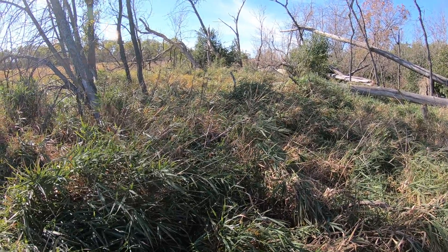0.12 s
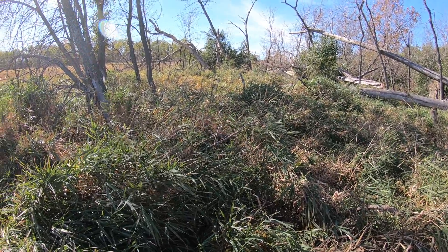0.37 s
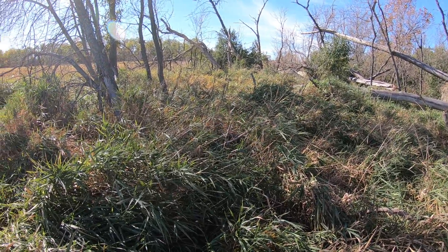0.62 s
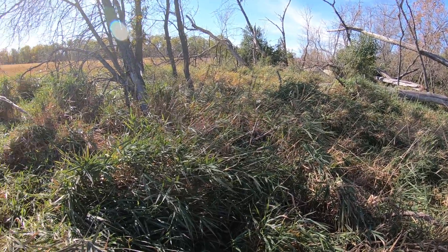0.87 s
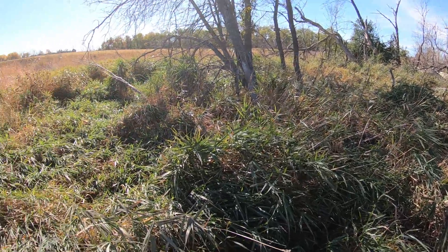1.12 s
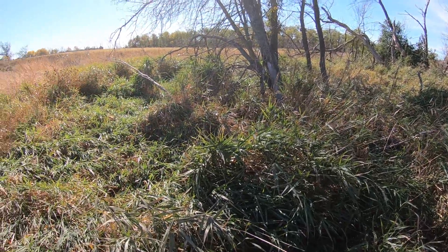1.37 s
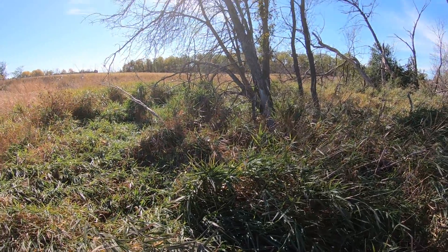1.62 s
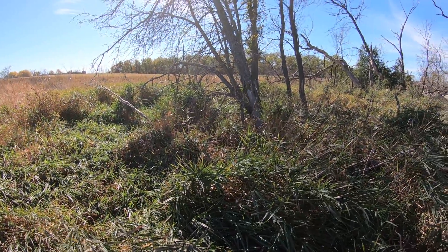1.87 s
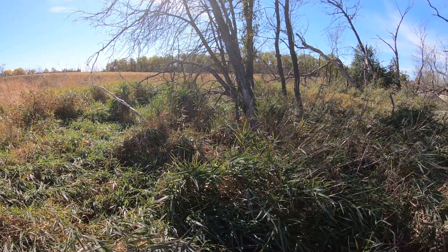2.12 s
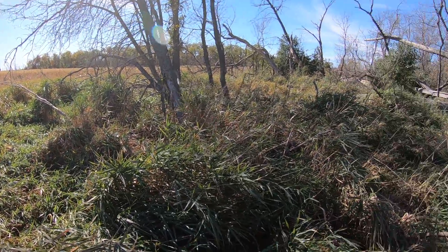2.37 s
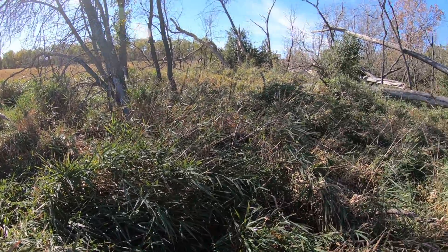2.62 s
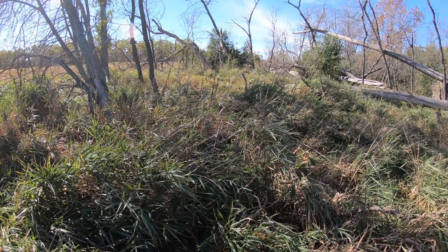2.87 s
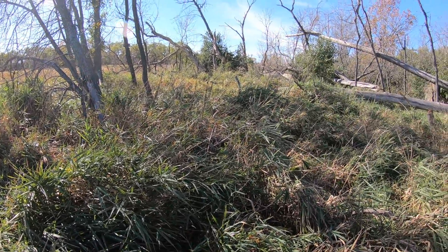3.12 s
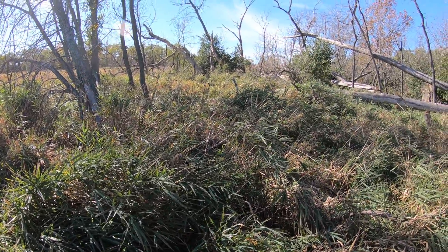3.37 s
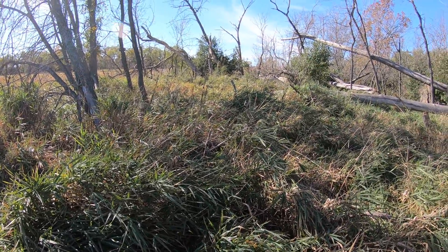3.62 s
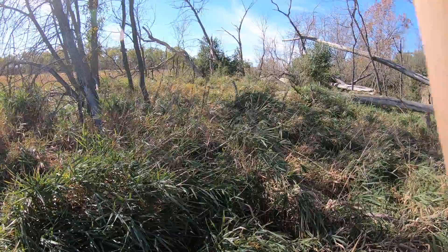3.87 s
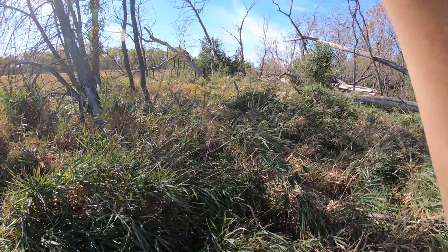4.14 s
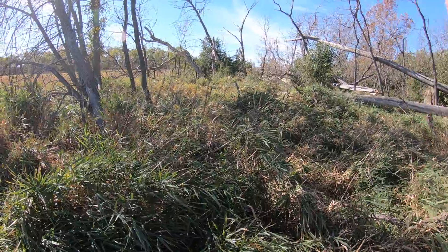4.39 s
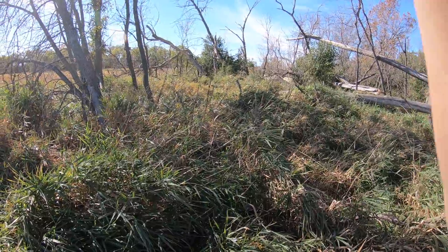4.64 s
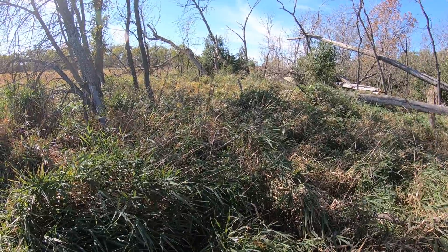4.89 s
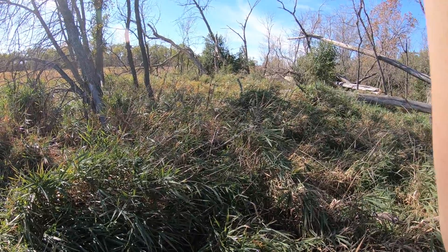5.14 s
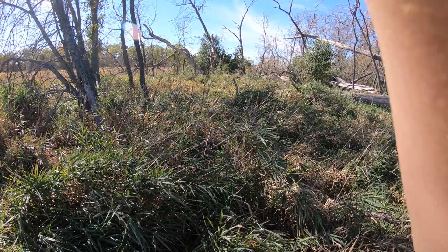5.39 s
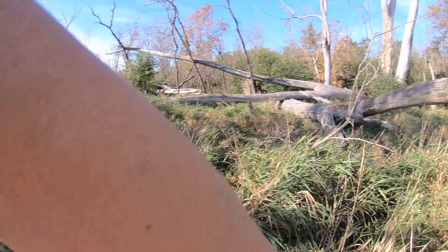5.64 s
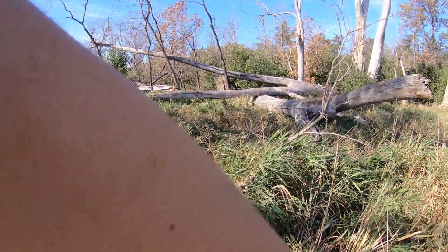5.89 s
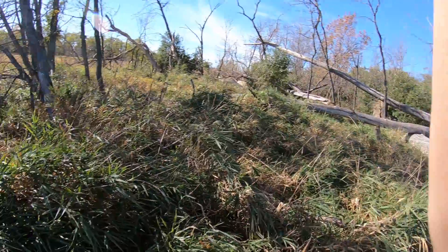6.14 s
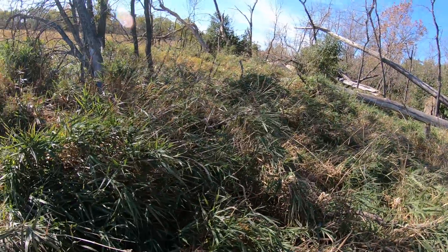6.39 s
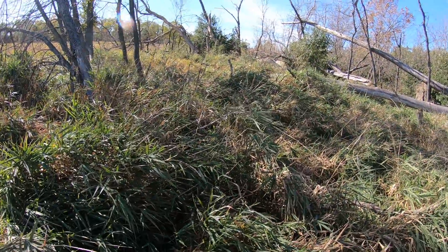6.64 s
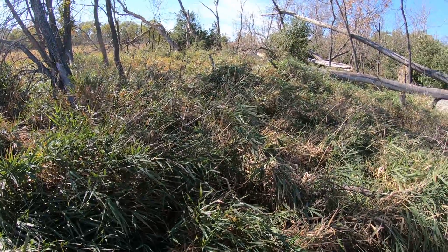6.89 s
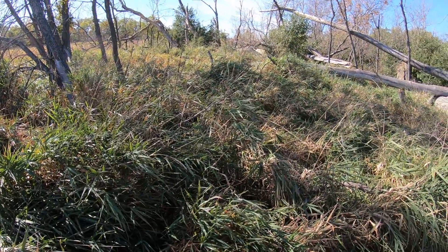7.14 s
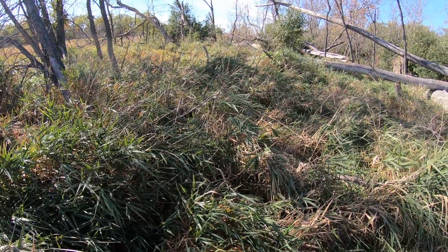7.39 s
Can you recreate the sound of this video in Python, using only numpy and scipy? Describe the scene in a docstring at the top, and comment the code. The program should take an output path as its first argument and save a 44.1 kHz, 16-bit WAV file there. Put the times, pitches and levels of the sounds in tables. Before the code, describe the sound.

Loud hard knocks come in uneven pairs close to the microphone, over gusty low wind rumble and the faint rustle of dry grass.

```python
"""Walking through dry grass

Someone moves through tall dry grass in gusty wind; pairs of hard knocks strike close to a small microphone.
Wind, grass and hiss are shaped noise, with faint narrow strips of noise; stalks snap in short puffs. A knock is
a short clipped ring with a crack and a thump; thin tones swell towards it. A limiter holds the peaks and ducks
wind and grass after them."""
import sys
import numpy as np
from scipy import signal
from scipy.fft import rfft, irfft
from scipy.io import wavfile
from scipy.ndimage import uniform_filter1d, minimum_filter1d

SR = 44100
rng = np.random.default_rng(int(sys.argv[2]) if len(sys.argv) > 2 else 0)


def put_to_file(sound):
    """Save the sound as 16-bit audio at rate SR, in the file named by the first command-line argument."""
    columns = np.atleast_2d(sound).T  # one column per channel
    safe = np.clip(columns, -1, 1)
    whole_steps = np.round(safe * 32767)
    wavfile.write(sys.argv[1], SR, whole_steps.astype(np.int16))


def volts(x):
    """Linear amplitude factor 10**(x/20) for a level x in dB, scalar or array-like."""
    e = np.asarray(x, float) / 20
    return 10 ** e


N = 331191  # length in samples


def evened(x):
    """Normalization: scales to rms 1."""
    return x / np.sqrt(np.mean(x ** 2) + 1e-20)


def read(points, hz):
    """Spectral interpolation: dB on a log-frequency axis, silent above the last point."""
    f, value = np.transpose(points)
    return np.interp(np.log(hz + 1), np.log(f + 1), value, right=-120)


def add(mix, s, sound):
    """Superposition: adds a sound into the mix from time s."""
    part = mix[round(s * SR):][:len(sound)]
    part += sound[:len(part)]


def follow(table):
    """Linear interpolation: joins a control table into one dB curve a column."""
    s, *columns = np.transpose(table)
    return [np.interp(np.arange(N) / SR, s, db) for db in columns]


def lumps(per_s):
    """Low-pass filtering: slow random fluctuation of rms 1, cut off at per_s in Hz."""
    b, a = signal.butter(2, per_s, fs=SR / 64)
    coarse = signal.lfilter(b, a, rng.standard_normal(N // 64 + 9))
    return np.interp(np.arange(N) / 64, np.arange(len(coarse)), evened(coarse))


def noise(colour, patchy_db, flicker_db, size=1024):
    """Overlap-add synthesis: random spectra with drifting patches and a flicker shared by all bins."""
    frames, hz = 4 * N // size + 5, np.fft.rfftfreq(size, 1 / SR)
    real, imag, patches = rng.standard_normal((frames, len(hz), 3)).T
    patches = uniform_filter1d(patches, size=5, axis=0)  # over frequency
    patches = evened(uniform_filter1d(patches, size=12, axis=1))  # over time
    flicker = evened(uniform_filter1d(rng.standard_normal(frames), size=3))
    level_db = read(colour, hz)[:, None] + patchy_db * patches + flicker_db * flicker
    spectra = (real + 1j * imag) * volts(level_db)
    sound = signal.istft(spectra, nperseg=size, noverlap=size * 3 // 4)[1]
    return evened(sound[:N])


def burst(colour, decay_s, size=1024):
    """Impulsive excitation: a puff of coloured noise, linear rise and exponential decay, peak 1."""
    t, hz = np.arange(size) / SR, np.fft.rfftfreq(size, 1 / SR)
    puff = irfft(rfft(rng.standard_normal(size)) * volts(read(colour, hz)))
    puff = puff * t * np.exp(-t / decay_s)
    return puff / abs(puff).max()


# rising and falling breeze on the microphone: t/s, strength level/dB, bite/dB (how far it reaches up in pitch)
GUSTS = [(0.0, -45.5, -3.5), (0.69, -35.5, -2.5), (0.94, -37, 8.5), (1.13, -45.5, -8.5),
         (1.23, -52.5, -4.5), (1.51, -44.5, 1.5), (1.65, -38.5, -2), (1.78, -39.5, 0.5), (1.92, -49, -3),
         (2.32, -58, -1), (2.49, -49.5, -1.5), (2.61, -44.5, -1.5), (3.01, -45.5, 2), (3.39, -51, -3),
         (3.72, -56, 1.5), (4.02, -34, -0.5), (5.02, -42.5, -3.5), (5.48, -56, -1.5), (6.73, -61.5, 5.5),
         (7.01, -38, -8.5), (7.11, -46, -11.5), (7.51, -36.5, 4.5)]
# single puffs of wind: t/s of the top, strength level/dB, length/s, bite/dB
PUFFS = [(0.094, -35, 0.15, -6.5), (.3, -32.5, 0.084, -2.5), (0.5, -34, 0.11, 1), (0.811, -31, 0.17, 0),
         (.95, -42, 0.1, -4.5), (1.046, -34.5, .12, 4.5), (1.215, -48.5, .05, -1.5), (1.279, -49, 0.028, 1),
         (1.6, -40, 0.055, 9.5), (1.666, -38.5, 0.076, 11), (1.86, -39.5, 0.16, -2),
         (2.226, -41.5, 0.074, -4.5), (2.707, -46, 0.13, -10), (2.99, -37.5, 0.039, -0.5),
         (3.096, -41.5, 0.13, -1.5), (3.282, -41, 0.047, 2), (3.805, -29.5, 0.032, -3.5),
         (3.865, -30, 0.064, 3.5), (4.11, -29.5, 0.24, 1), (4.21, -39, 0.052, 14.5), (4.386, -35, 0.11, 10),
         (4.47, -44, 0.023, 11), (4.591, -47.5, 0.039, -13), (4.83, -33, 0.19, 7), (5.165, -25, 0.18, 2),
         (5.5, -52.5, 0.064, -19), (5.952, -41.5, .04, -5), (6.136, -42.5, 0.055, -7),
         (6.217, -37.5, .1, -0.5), (6.417, -50, 0.042, -14), (6.87, -48.5, .1, -1.5),
         (7.144, -27.5, 0.17, -2), (7.302, -48, 0.067, 1.5), (7.472, -32.5, 0.14, -2.5)]


def wind_strength():
    """Amplitude addition: bell-shaped puffs ride on the breeze and bring their own bite; both in dB."""
    breeze, bite = follow(GUSTS)
    t, total = np.arange(N) / SR, volts(breeze)
    bite = bite * total  # bite is averaged with amplitude as its weight
    for s, db, length, reach_db in PUFFS:
        puff = volts(db) * np.exp(-((t - s) / (0.36 * length)) ** 2)
        total = total + puff
        bite = bite + reach_db * puff
    return 20 * np.log10(total), bite / total


# relative spectra of the wind, from lowest layer to highest: f/Hz, level/dB (per Hz)
RUMBLE = [(12, -38.5), (25, -4), (60, 6), (110, 1), (160, -6), (300, -59.5), (500, -82)]
BUFFET = [(70, -32), (130, -3), (180, 0), (260, -7.5), (350, -15), (500, -55.5), (800, -75)]
ROAR = [(200, -28), (330, -2.5), (460, -6), (700, -16), (1000, -31.5), (1500, -50.5), (2500, -87)]


def wind():
    """Turbulent pressure on a microphone: three lumpy noise layers rise with strength; bite tilts them."""
    BREEZE_DB = -50  # strength of a light breeze, from which the layers rise
    strength, bite = wind_strength()
    gust = strength - BREEZE_DB
    rumble_db = BREEZE_DB - 2 + gust - 0.36 * bite + 1.3 * lumps(20)
    buffet_db = BREEZE_DB - 1 + 0.64 * gust + 0.8 * bite + 4 * lumps(14)
    roar_db = BREEZE_DB - 16 + 0.88 * gust + 1.6 * bite + 3.5 * lumps(20)
    rumble = volts(rumble_db) * noise(RUMBLE, 0.97, 0.54, size=2048)
    buffet = volts(buffet_db) * noise(BUFFET, 1.9, 1.2)
    roar = volts(roar_db) * noise(ROAR, 0.38, 1.8, size=512)
    return rumble + buffet + roar


# rustling in time: t/s, rustle level/dB, airiness level/dB (relative to the rustle)
RUSTLES = [(0.0, -47, -29), (0.21, -45.5, -27.5), (0.33, -49.5, -26.5), (0.67, -49, -29), (1.21, -52, -29),
           (1.42, -53.5, -28.5), (2.05, -56, -29), (2.7, -52.5, -29.5), (2.87, -54.5, -27.5),
           (3.09, -54.5, -29), (3.24, -56, -29.5), (4.87, -50.5, -28), (4.98, -48, -27), (5.1, -58, -28.5),
           (5.29, -58, -29), (5.73, -55, -29.5), (5.9, -60.5, -27), (6.02, -56.5, -26.5),
           (6.94, -51.5, -27.5), (7.51, -50, -27.5)]
# relative spectra of low swish, rustle and airy top: f/Hz, level/dB (per Hz)
SWISH = [(300, -24.5), (700, -3), (1250, -1.5), (1700, -3), (2300, -3.5), (3000, -35.5), (4000, -48.5)]
GRASS = [(1500, -33), (2300, -11.5), (3000, -6), (4300, -6), (5300, -1), (6600, -9.5), (7900, -24),
         (10000, -33), (12000, -57.5)]
AIR = [(9000, -21.5), (11500, -1.5), (13000, 4.5), (14500, -2.5), (16000, -9.5)]


def grass():
    """Broadband friction noise: rustle with an airy top, over a swish that follows it less steeply."""
    rustle, airy = follow(RUSTLES)
    swish_db = -64 + 0.46 * (rustle - rustle.mean())
    swish = volts(swish_db) * noise(SWISH, 0.28, 0.8)
    blades = noise(GRASS, 2.7, 0.68) + volts(airy) * noise(AIR, 1.5, 0.8)
    return swish + volts(rustle) * blades


# relative spectrum of the capsule's own hiss: f/Hz, level/dB (per Hz)
CAPSULE = [(500, 0), (5000, -3), (9000, -14), (16000, -15.5)]


def capsule_hiss():
    """Self-noise: the capsule's faint, nearly steady hiss."""
    return volts(-84) * noise(CAPSULE, 0.4, 0.21)


# faint narrow strips of noise between knocks: start t/s, f/Hz, bandwidth/Hz, level/dB
NOISE_STRIPS = [(0, 4160, 294, -48.5), (0.36, 4460, 70, -58.5), (0.72, 4170, 70, -62),
                (0.719, 6890, 60, -79.5), (2.6, 4240, 250, -56), (2.9, 4000, 100, -64.5),
                (2.901, 7600, 60, -79), (4.009, 9720, 59.6, -89), (5.118, 3353, 50, -65.5),
                (5.12, 6300, 70, -67), (5.93, 4046, 60, -66.5), (6.298, 4680, 70, -64)]


def noise_strips():
    """Narrow-band noise: a faint narrow strip of noise sounds from its start until a following knock."""
    out = np.zeros(N)
    for start, hz, width_hz, db in NOISE_STRIPS:
        end = min(row[0] for row in KNOCKS if row[0] > start + 0.1)
        t = np.arange(start, end, 1 / SR)
        r = np.exp(-np.pi * width_hz / SR)  # pole radius
        hiss = rng.standard_normal((len(t), 2)) @ [1, 1j]
        waver = signal.lfilter([1], [1, -2 * r, r * r], hiss)
        strip = evened((waver * np.exp(2j * np.pi * hz * t)).real)
        add(out, start, volts(db) * strip * signal.windows.tukey(len(t), 0.2))
    return out


# thin tones, one list a knock: f/Hz, level/dB, offset f/Hz of a weaker neighbour that beats with it
TONES = [
    [(1260, -24, -120), (2180, -27.5, 111), (3830, -35.5, 106), (5080, -32, -160), (4544, -38, 87.5),
     (6331, -37.5, 87.5)],
    [(1252, -24.5, -74), (2000, -34, 300.5), (2500, -30.5, 88), (4270, -25.5, 312.5), (4790, -29.5, 108.5),
     (6900, -39.5, 114.5)],
    [(1150, -36, -124), (1676, -37.5, -77.5), (2900, -45.5, 180.5), (882, -44, 106), (2300, -45, -80.5),
     (4300, -48.5, 298)],
    [(1266, -27.5, 91), (2030, -30.5, 92), (4285, -32, 97.5), (4940, -31, -79.5), (5360, -36, -97.5)],
    [(1234, -22.5, -85), (2700, -45, -88), (5032, -41, 87.5), (4155, -42, 148)],
    [(1260, -25.5, -147), (2694, -33.5, 95), (4100, -30.5, -330), (5470, -30, -216), (5098, -40, 178)],
    [(1165, -35.5, 87.5), (2196, -36, -280), (4690, -29.5, 193), (5190, -29.5, -178), (5860, -36.5, 89)],
    [(406, -35.5, 84), (2255, -32, 103.5), (5600, -26, 73.5), (6000, -37.5, -113)],
    [(693, -32.5, -190), (1465, -27.5, 93.5), (1694, -29.5, 326.5), (5100, -39.5, 371.5)],
    [(1634, -21, -120), (1815, -24, 92), (3360, -35, -160), (5050, -27, 87), (5800, -37.5, -183),
     (5880, -32.5, 695.5)],
    [(1163, -27, -76), (1590, -33.5, 95), (2795, -38, -247), (3317, -45.5, 202)],
    [(2684, -25, -244), (4370, -36, 168.5), (5857, -44.5, -100)],
    [(1196, -33.5, -104), (1640, -35, -147), (2303, -36.5, 92), (4700, -39, 182.5)],
    [(1163, -23, -109), (1647, -31.5, 88.5), (2220, -24.5, 51), (3770, -33.5, 98), (4350, -26, 270)],
]
# swell of low tones, high tones and hiss: crest t/ms from the halo's middle, crest level/dB,
# rise/ms from -20 dB
SWELL = [(-2, 7.5, 21.5), (-3.5, 2.5, 24.5), (2, 10.5, 24)]
# relative spectrum of the hiss that swells with the thin tones, also in the knock's echoes: f/Hz, level/dB (per
# Hz)
HALO_HISS = [(200, -15.5), (500, 9.5), (1500, -5.5), (3000, -8.5), (6000, -10), (7200, -30.5), (9500, -63)]


def halo(pairs):
    """Beating: paired thin tones in a hiss round their pitches swell and fade; high tones crest earlier."""
    NEIGHBOUR_DB, RISE_BEND = -7.5, 1.4
    FADE_DB_PER_MS, CUT_MS = 0.74, 24  # the fade steepens towards CUT_MS and beyond
    t = np.arange(-2205, 2205) / SR
    swells = []
    for crest_ms, db, rise_ms in SWELL:
        before = np.maximum(crest_ms - t * 1000, 0)
        after = np.maximum(t * 1000 - crest_ms, 0)
        rise_db = -20 * (before / rise_ms) ** RISE_BEND
        fade_db = -FADE_DB_PER_MS * after - 20 * (after / CUT_MS) ** 4
        swells.append(volts(db + rise_db + fade_db))
    low, high, grain = swells
    tones = [(hz, db) for hz, db, off in pairs]
    tones += [(hz + off, db + NEIGHBOUR_DB) for hz, db, off in pairs]
    f = np.fft.rfftfreq(len(t), 1 / SR)
    lines, colour = np.zeros(len(t)), volts(read(HALO_HISS, f) - 43.5)
    for hz, db in tones:
        swell = low if hz < 2400 else high
        lines += swell * volts(db) * np.sin(2 * np.pi * (hz * t + rng.random()))
        colour += volts(db) * np.exp(-((f - hz) / 140) ** 2)
    hiss = irfft(rfft(rng.standard_normal(len(t))) * colour)
    return lines + volts(13) * grain * hiss


# knocks: t/s, ring f/Hz, then level/dB relative to the blow of thump, crack (before clipping) and treble snap
KNOCKS = [(0.3525, 1113, -42, -5, -36), (0.7071, 1279, -34, -3.5, -37), (1.4196, 980, -14.5, -6.5, -35),
          (1.774, 1920, -20.5, -0.5, -38.5), (2.5311, 830, -10, -7.5, -43),
          (2.8902, 1510, -9.5, -0.5, -36.5), (3.6427, 1210, -29, -6.5, -40), (4.0018, 1278, -33.5, 2, -30),
          (4.7274, 1123, -11.5, -15, -45.5), (5.1101, 902, -11.5, -5.5, -36),
          (5.899, 1267, -6.5, -8, -35.5), (6.2881, 1312, -6, 1.2, -22), (7.0603, 1163, -3, -3.5, -39.5),
          (7.4123, 1136, -17, -4, -30)]
# relative spectrum of the crack: f/Hz, level/dB (per Hz)
CRACK = [(500, -1.5), (1500, 0.5), (3000, -7), (5500, -10.5), (7000, -16.5), (9000, -34.5), (12000, -64.5)]


def knock(ring_hz, thump_db, crack_db, snap_db):
    """Overload clipping: ring, push of air and crack saturate; housing thump, snap and echoes add to them."""
    BLOW_DB = 18  # far over the limiter's ceiling
    PUSH_DB, BRIGHT_DB, PUSH_LOSS = 0.88, -36, 1.8  # a blow whose snap passes BRIGHT_DB moves less air
    t = np.arange(2048) / SR
    u = t / 0.00064
    ring = (u * np.exp(1 - u)) ** 2 * np.sin(2 * np.pi * ring_hz * t)
    push_db = PUSH_DB - PUSH_LOSS * max(snap_db - BRIGHT_DB, 0)
    push = volts(push_db) * np.exp(-((t - 0.0011) / 0.00042) ** 2)
    crack = volts(crack_db) * burst(CRACK, 0.00078, size=2048)
    squashed = np.tanh(1.6 * (ring + push + crack))  # the capsule overloads: cycles come out equally tall
    low_cut = signal.butter(3, 240, "high", fs=SR, output="sos")
    top_cut = signal.butter(8, 6600, fs=SR, output="sos")
    blow = signal.sosfilt(np.vstack([low_cut, top_cut]), squashed)
    thump_envelope = volts(thump_db - 60 * t / 0.03) * (1 - np.exp(-t / 0.0016))
    thump = thump_envelope * np.sin(2 * np.pi * 172 * t)
    snap_colour = [(6000, -20.5), (8000, 7), (13000, -7), (16000, -4)]
    snap = volts(snap_db) * burst(snap_colour, 0.00069, size=2048)
    # nearby stalks and the walker's body scatter the blow
    echoes = volts(-33.5) * burst(HALO_HISS, 0.0042, size=2048)
    return volts(BLOW_DB) * (blow + thump + snap + echoes)


# small stalks snapping: t/s, peak level/dB
SNAPS = [(0.4643, -46), (1.1119, -40), (2.6379, -45.5), (3.3378, -42.5), (3.3672, -43.5), (3.9285, -30.5),
         (4.1455, -33), (6.6069, -40.5), (7.1242, -31)]


def snaps():
    """Brittle fracture: dry stalks break with a tick, a very short puff of bright noise."""
    out = np.zeros(N)
    colour = [(1500, -5), (4000, 11.5), (8000, -6), (15000, -31.5)]
    for s, db in SNAPS:
        add(out, s, volts(db) * burst(colour, 0.00098))
    return out


def scene():
    """Superposition: knocks with their halos over wind and grass."""
    out = wind() + grass() + capsule_hiss() + noise_strips() + snaps()
    for (s, *row), tones in zip(KNOCKS, TONES):
        add(out, s + 0.0015 - 2205 / SR, halo(tones))  # its middle falls 1.5 ms into the knock
        add(out, s, knock(*row))
    return out[None]


def limiter(dry):
    """Gain reduction: looks ahead, clamps each peak and lets go in a quick and a slow stage."""
    CEILING = 0.95
    QUICK_S, SLOW_S, SLOW_SHARE = 0.04, 0.13, 0.55  # release time constants, share of the slow stage
    over_db = np.maximum(20 * np.log10(abs(dry[0]) / CEILING + 1e-9), 1e-3)
    ahead_db = -minimum_filter1d(-over_db, size=61)  # running maximum
    t = np.arange(N) / SR

    def release(s):
        """Exponential relaxation: the reduction in dB jumps up with a peak and decays with time constant s."""
        return np.exp(np.maximum.accumulate(np.log(ahead_db) + t / s) - t / s)

    held_db = np.maximum(release(QUICK_S), SLOW_SHARE * release(SLOW_S))
    smooth_db = uniform_filter1d(uniform_filter1d(held_db, size=31), size=31)
    return dry / volts(smooth_db)


def band_limit(x):
    """A steep low-pass at the top of the band."""
    return signal.sosfilt(signal.butter(12, 15970, fs=SR, output="sos"), x)


def record(dry):
    """Signal chain: the scene passes through the limiter first."""
    mix = limiter(dry)
    return band_limit(mix)


dry = scene()
out = record(dry)
put_to_file(out)
```